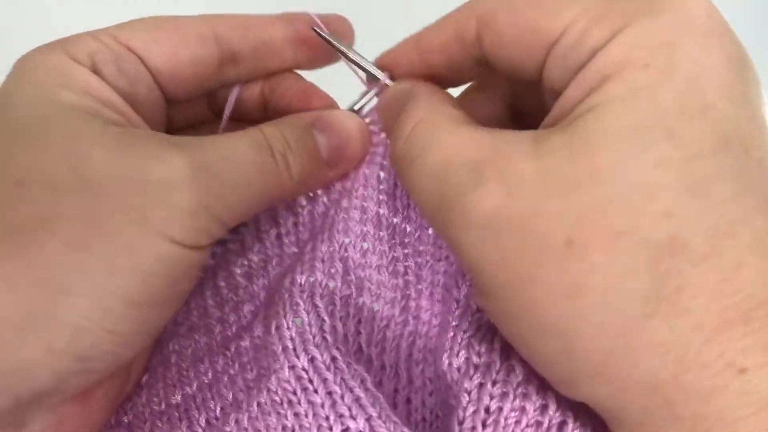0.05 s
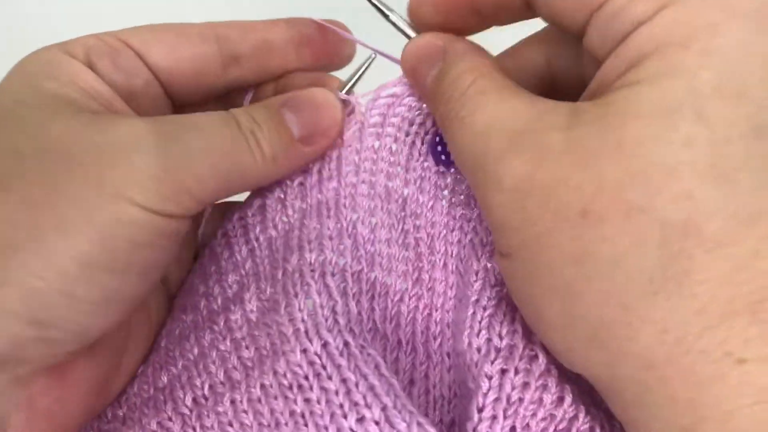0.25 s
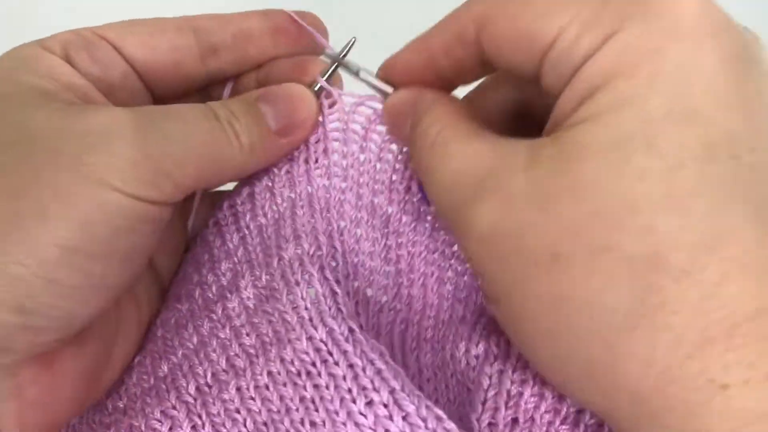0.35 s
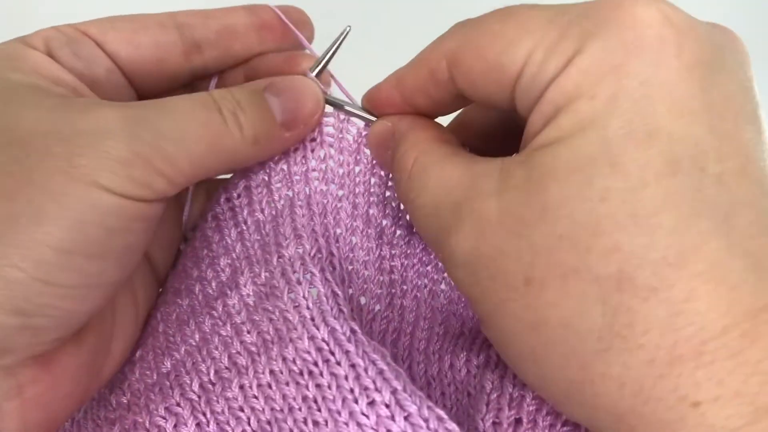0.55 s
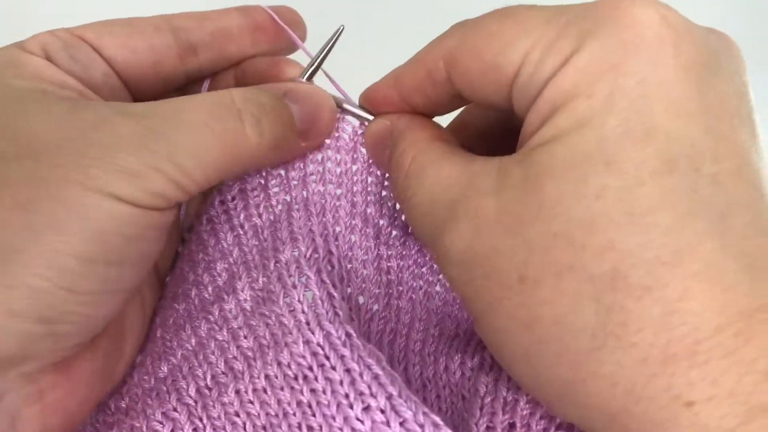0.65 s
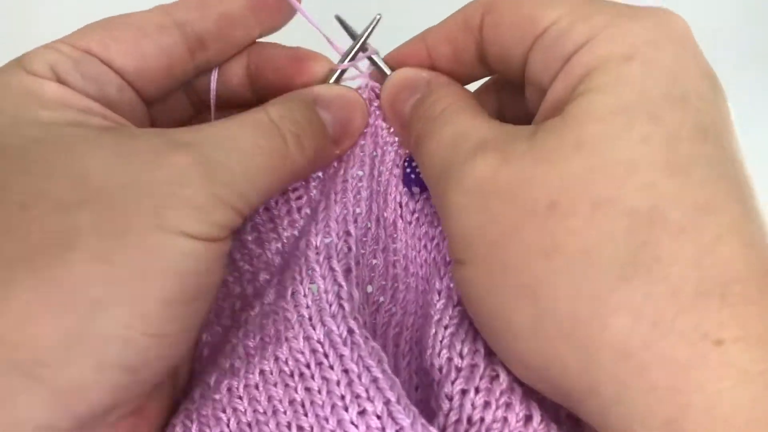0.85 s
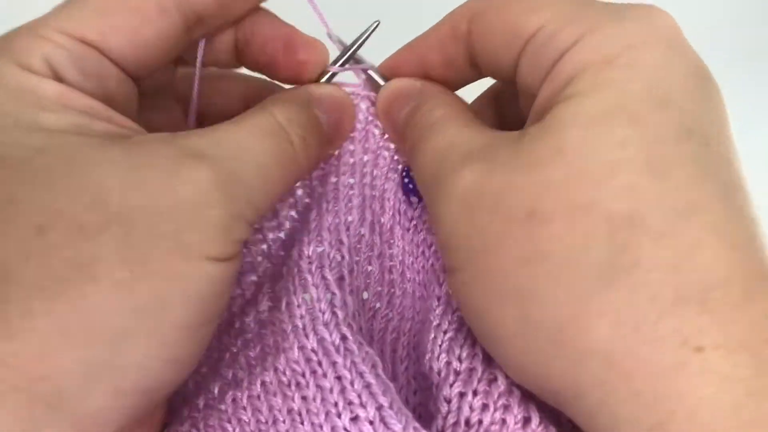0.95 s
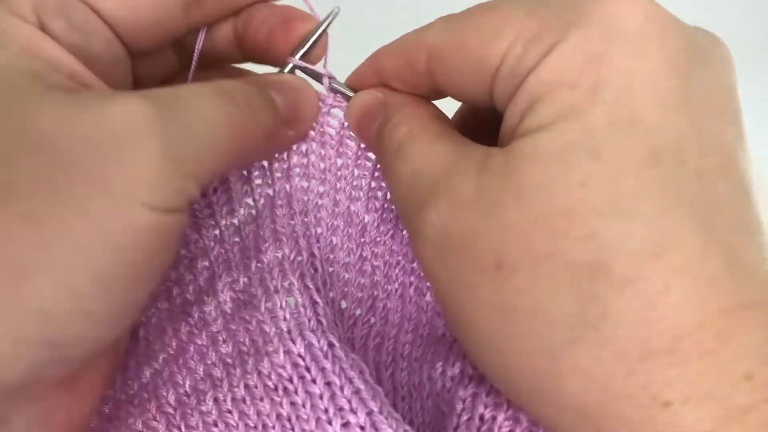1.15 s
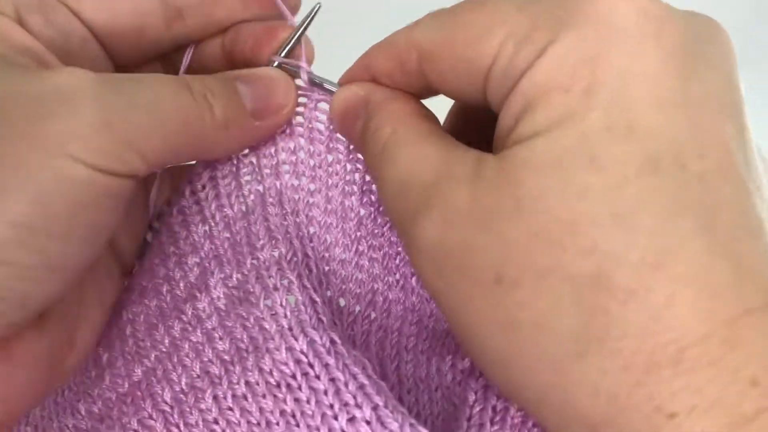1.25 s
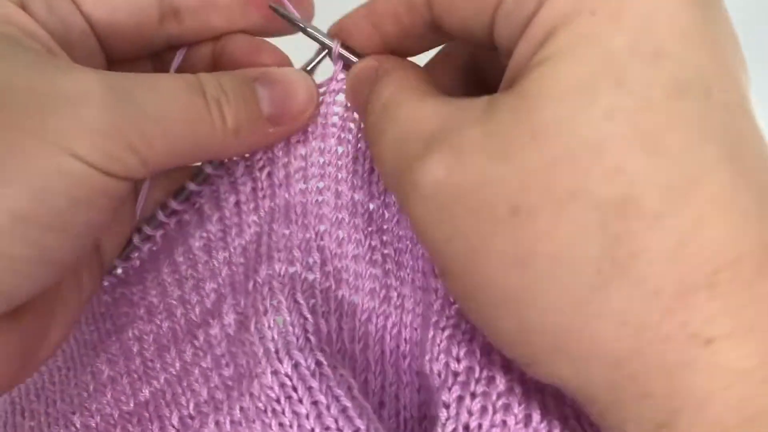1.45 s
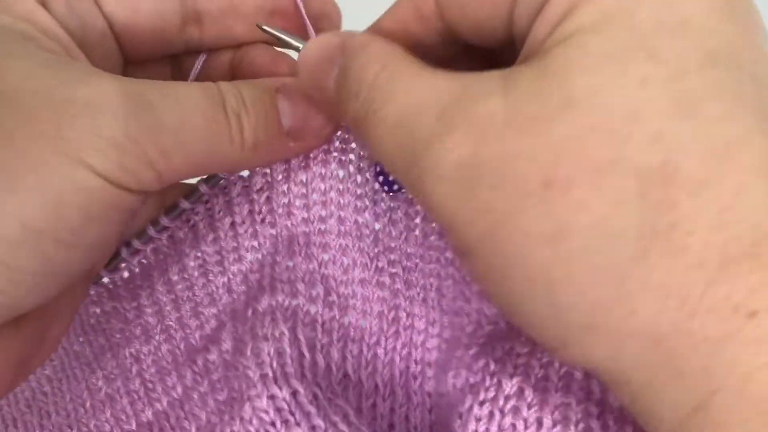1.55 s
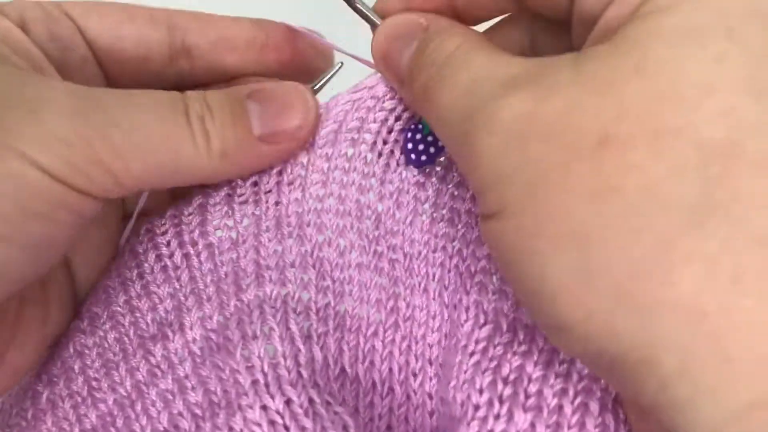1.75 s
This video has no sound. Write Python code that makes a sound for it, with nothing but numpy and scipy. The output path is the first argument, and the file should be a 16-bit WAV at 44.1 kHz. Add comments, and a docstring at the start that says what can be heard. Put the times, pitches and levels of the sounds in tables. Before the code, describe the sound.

Faint soft swishes of yarn sliding on metal knitting needles, with a few tiny ticks.

```python
"""A quiet room with a low hum, where hands knit with metal needles close to the microphone.
Stick-slip friction makes the soft swells: yarn slides along the needles, fingers brush the strand
and the fabric shifts. Impacts excite the needles' modes, heard as a few bright ticks and one dull bump,
and one fibre snaps free. The moving hands stir slow pressure swings, a deep rumble."""
import sys
import numpy as np
from scipy import signal
from scipy.fft import rfft, irfft
from scipy.io import wavfile
from scipy.ndimage import uniform_filter1d

SR = 44100
rng = np.random.default_rng(int(sys.argv[2]) if len(sys.argv) > 2 else 0)


def wrap_up_sound(samples):
    """Save the sound to the file named by the first command line argument, as 16-bit audio."""
    columns = np.atleast_2d(samples).T
    # keep every value between -1 and 1, then stretch to whole-number steps
    tamed = np.clip(columns, -1, 1)
    steps = np.round(tamed * 32767).astype(np.int16)
    wavfile.write(sys.argv[1], SR, steps)


N = 79380
T = np.arange(N) / SR
BINS_HZ = np.arange(N // 2 + 1) * SR / N


def from_db(db):
    """Amplitude ratio of a level in decibels."""
    return 10 ** (np.asarray(db) / 20)


def unit_rms(x):
    """Normalisation to a mean power of 1."""
    return x / np.sqrt(np.mean(x ** 2) + 1e-20)


def coloured(x, spectrum):
    """Spectral shaping: gains are interpolated over log frequency; the result has rms 1."""
    hz, db = np.transpose(spectrum)
    gain = from_db(np.interp(np.log(np.maximum(BINS_HZ, 1)), np.log(hz), db))
    return unit_rms(irfft(rfft(x) * gain, N))


def drift(corner_hz):
    """Low-pass noise: a slow random wander of mean 0 and rms 1."""
    noise = rfft(rng.standard_normal(N)) * (BINS_HZ > 0)
    return unit_rms(irfft(noise / (1 + (BINS_HZ / corner_hz) ** 2), N))


def impulse(start_s, level_db):
    """An ideal impact, one sample long."""
    return from_db(level_db) * (np.arange(N) == int(start_s * SR))


def resonator(force, pitch_hz, t60_s):
    """Damped oscillator: a unit impulse starts a decaying sine of amplitude 1."""
    radius, angle = from_db(-60 / (t60_s * SR)), 2 * np.pi * pitch_hz / SR
    return signal.lfilter([0, np.sin(angle)], [1, -2 * radius * np.cos(angle), radius ** 2], force + 1e-18)


def swells(strokes, squareness=2.16):
    """Incoherent addition: each stroke speeds up and slows down in a bell, and their powers add."""
    power = 0
    for peak_s, rise_s, fall_s, level_db in strokes:
        distance = np.abs(T - peak_s) / np.where(T < peak_s, rise_s, fall_s)
        power += from_db(level_db) ** 2 * np.exp(-distance ** squareness)
    return np.sqrt(power)


def rubbing(strokes, spectrum, flutter_db, catches_per_s=14000, spread_db=2):
    """Stick-slip friction: countless fibres catch and let go under an unevenly moving stroke."""
    sizes = from_db(spread_db * np.minimum(rng.exponential(1, N), 5)) * rng.choice([-1, 1], N)
    catches = sizes * (rng.random(N) < catches_per_s / SR)
    return coloured(catches, spectrum) * swells(strokes) * from_db(flutter_db * drift(corner_hz=38))


# tones of the room hum: pitch_hz, level_db, waver_db
HUM_TONES = [(48.93, -59.5, -4), (100.3, -62.5, -0.15), (191.5, -85.5, 4)]
# room air and microphone hiss: frequency_hz, relative_db
AIR_SPECTRUM = [(20, 4), (70, 0), (110, -7), (170, -23), (240, -16), (340, -12.5), (480, -26), (800, -29.5),
                (1500, -38), (4000, -36), (9500, -34), (12000, -35), (15500, -43)]
def room_tone(air_db=-62.5):
    """Amplitude modulation: the hum's tones waver at random over a broadband noise floor."""
    hum = 0
    for pitch_hz, level_db, waver_db in HUM_TONES:
        amplitude = np.sqrt(2) * from_db(level_db + waver_db * drift(corner_hz=6.2))
        hum += amplitude * np.sin(2 * np.pi * (pitch_hz * T + rng.random()))
    return hum + from_db(air_db) * coloured(rng.standard_normal(N), AIR_SPECTRUM)


# swell and fade of a low drone: time_s, level_db
DRONE_LEVELS = [(0, -66), (.28, -71), (.42, -60.5), (.68, -63.5), (.95, -68), (1.15, -63.5), (1.28, -75),
                (1.8, -66)]
def room_drone(pitch_hz=131.8, wander_hz=5.7, waver_db=1.5):
    """Random modulation of frequency and amplitude spreads a low tone into a narrow band."""
    cycles = np.cumsum(pitch_hz + wander_hz * drift(corner_hz=14)) / SR
    level_db = np.interp(T, *np.transpose(DRONE_LEVELS)) + waver_db * drift(corner_hz=30)
    return np.sqrt(2) * from_db(level_db) * np.sin(2 * np.pi * cycles)


# rumble of the moving hands: time_s, level_db
RUMBLE_LEVELS = [(0, -66.5), (.08, -49.5), (.2, -46), (.29, -47.5), (.38, -43), (.57, -38.5), (.7, -46),
                 (.83, -44.5), (1.02, -34.5), (1.2, -31.5), (1.3, -37.5), (1.43, -38), (1.54, -44),
                 (1.8, -67.5)]
# the hands push the work together: peak_s, rise_s, fall_s, level_db
PUSH_STROKES = [(1.185, .045, 0.045, -36.5)]
# spectra of the rumble and the push: frequency_hz, relative_db
RUMBLE_SPECTRUM = [(6, -14), (12, 11.5), (26, -1.5), (42, -15.5), (75, -21.5), (110, -38), (170, -49.5),
                   (400, -70.5)]
PUSH_SPECTRUM = [(20, 9), (45, 7.5), (75, -9), (100, -26), (150, -34), (220, -25.5), (400, -54.5)]
def hand_rumble():
    """Low-frequency pressure fluctuations follow the hands, with a soft thud when they push."""
    swings = coloured(rng.standard_normal(N), RUMBLE_SPECTRUM)
    running_rms = np.sqrt(uniform_filter1d(swings ** 2, size=6000) + 1e-9)
    rumble = swings / running_rms * from_db(np.interp(T, *np.transpose(RUMBLE_LEVELS)))
    thud = swells(PUSH_STROKES) * coloured(rng.standard_normal(N), PUSH_SPECTRUM)
    return rumble + thud


# echoes from the table and nearby walls: delay_s, gain_db
EARLY_ECHOES = [(.0031, -15), (.0074, -16), (.0127, -17), (.0193, -19)]
def with_reflections(direct):
    """Superposition: faint delayed copies add to the direct sound."""
    return direct + sum(from_db(db) * np.pad(direct, (int(s * SR), 0))[:N] for s, db in EARLY_ECHOES)


# the fabric moves in the hands: peak_s, rise_s, fall_s, level_db
FABRIC_STROKES = [(.16, 0.031, 0.17, -77), (.46, .1, 0.089, -73), (.88, 0.15, 0.18, -72.5),
                  (1.08, 0.054, 0.086, -62), (1.35, 0.12, 0.066, -68.5), (1.49, .03, 0.041, -73.5)]
# its rustle: frequency_hz, relative_db
FABRIC_SPECTRUM = [(130, -28), (220, -23), (290, -4.5), (345, 0), (425, 2), (485, -1), (560, -4),
                   (640, -14), (780, -10.5), (950, -24), (1130, -10.5), (1400, -19.5), (1750, -19.5),
                   (2400, -32), (6000, -27), (15000, -55)]
def fabric_shifts():
    """Friction of the knitted fabric gives a dull rustle, strongest in the low midrange."""
    return rubbing(FABRIC_STROKES, FABRIC_SPECTRUM, flutter_db=0.53)


def needle_bump():
    """Damped vibration: a nudged needle rings low and the fingers absorb its energy."""
    return resonator(impulse(start_s=.9898, level_db=-50), pitch_hz=412, t60_s=.06)


def fibre_snap(band_hz=(650, 7000)):
    """Sudden release: one fibre snaps free as a band-limited impulse, a dry click."""
    band = signal.butter(2, band_hz, "band", fs=SR, output="sos")
    return signal.sosfilt(band, impulse(start_s=.4227, level_db=-36.5) + 1e-18)


# impacts of the needle tips: start_s, level_db
TIP_CONTACTS = [(0.1554, -54), (.4511, -48), (1.507, -67)]
# modes of the metal needles: pitch_hz, gain_db, t60_s
TIP_MODES = [(8800, -5, 0.0041), (9800, -4, .005), (11000, -0.5, 0.0015), (13800, -3, 0.0023),
             (15500, -5, 0.00091)]
def needle_ticks(echo_s=.003, echo_db=-6, tail_db=-1.5, tail_t60_s=.07):
    """Modal ringing: each contact excites high modes, with one near reflection and a diffuse tail."""
    hits = sum(impulse(s, db) + impulse(s + echo_s, db + echo_db) for s, db in TIP_CONTACTS)
    ringing = sum((-1) ** k * from_db(db) * resonator(hits, hz, t60_s)
                  for k, (hz, db, t60_s) in enumerate(TIP_MODES))
    tail = rng.standard_normal(N) * from_db(-60 * T / tail_t60_s)
    return ringing + from_db(tail_db) * signal.fftconvolve(ringing, tail / np.linalg.norm(tail))[:N]


# fingers brush the strand: peak_s, rise_s, fall_s, level_db
BRUSH_STROKES = [(.065, 0.06, 0.014, -77), (.13, 0.029, 0.023, -70.5), (.198, 0.027, 0.021, -71),
                 (.253, 0.021, 0.015, -72.5), (.335, 0.042, 0.033, -76), (.57, 0.0068, .015, -74),
                 (.945, 0.022, 0.039, -68.5), (1.012, 0.033, 0.051, -68.5), (1.17, 0.067, 0.045, -65),
                 (1.315, 0.044, 0.03, -69), (1.392, 0.043, 0.035, -68.5), (1.5, 0.032, 0.022, -69),
                 (1.6, 0.067, 0.12, -71)]
# their hiss: frequency_hz, relative_db
BRUSH_SPECTRUM = [(300, -35), (1100, -4), (2500, -6), (4500, -6), (7000, -2), (8500, 0), (9600, 2),
                  (10500, -3), (12000, -18), (15500, -21)]
def finger_brushes():
    """Friction between skin and yarn gives a faint, bright hiss."""
    return rubbing(BRUSH_STROKES, BRUSH_SPECTRUM, flutter_db=0.96)


# resonances while the yarn is drawn: peak_s, rise_s, fall_s, level_db, pitch_hz
DRAW_RESONANCES = [(1.09, 0.067, 0.034, -71, 572), (1.13, 0.095, 0.044, -76, 3700),
                   (1.678, 0.041, 0.092, -66, 442), (1.74, 0.069, .08, -75, 1110)]
def drawn_strand(t60_cycles=54):
    """Forced resonance: friction noise drives narrow modes of the strand and needles."""
    return sum(swells([stroke]) * unit_rms(resonator(rng.standard_normal(N), hz, t60_cycles / hz))
               for *stroke, hz in DRAW_RESONANCES)


# yarn slides along a needle: peak_s, rise_s, fall_s, level_db
SLIDE_STROKES = [(.365, 0.035, .035, -70.5), (.453, 0.023, 0.02, -67.5), (.518, 0.018, 0.023, -70.5),
                 (.782, 0.073, 0.055, -62.5), (1.222, 0.017, 0.042, -64.5), (1.728, 0.053, .068, -55.5)]
# its swish: frequency_hz, relative_db
SLIDE_SPECTRUM = [(200, -39), (400, 4), (650, 2.5), (950, -6), (1150, -1.5), (1450, -1), (1750, -1),
                  (2200, -1.5), (3300, -0.5), (4100, 1), (5500, 0.5), (8200, 2.5), (9700, 1.5),
                  (11500, -11.5), (15500, -18.5)]
def yarn_slides():
    """Sliding friction of yarn on metal gives smooth swells of broadband noise."""
    return rubbing(SLIDE_STROKES, SLIDE_SPECTRUM, flutter_db=0.3)


def scene():
    """Linear superposition: the pressures of all sources add at one close microphone."""
    friction = yarn_slides() + finger_brushes() + drawn_strand() + fabric_shifts()
    transients = needle_ticks() + fibre_snap() + needle_bump()
    return (with_reflections(friction) + transients + hand_rumble() + room_tone() + room_drone())[None]


def record(dry, cutoff_hz=15700):
    """Band limiting: a steep elliptic low-pass removes the highest treble."""
    low_pass = signal.ellip(12, .1, 90, cutoff_hz, fs=SR, output="sos")
    padded = np.pad(dry, ((0, 0), (N, 0)), mode="edge")  # a lead-in lets the filter settle
    return signal.sosfilt(low_pass, padded)[:, N:]


dry = scene()
out = record(dry)
wrap_up_sound(out)
```